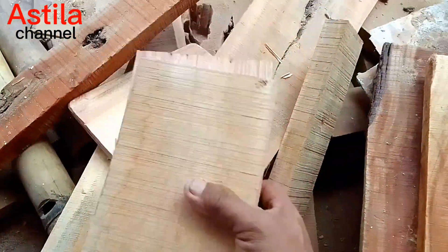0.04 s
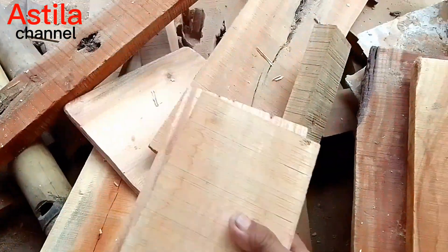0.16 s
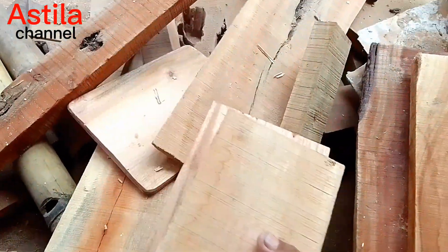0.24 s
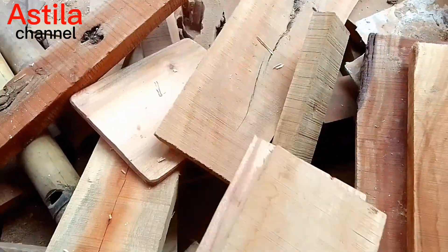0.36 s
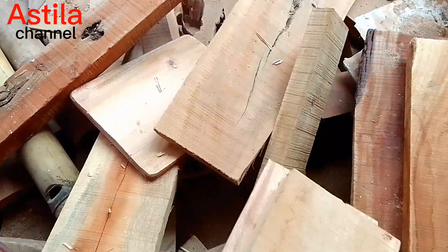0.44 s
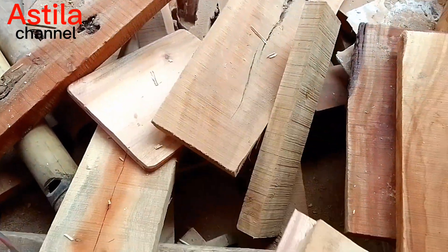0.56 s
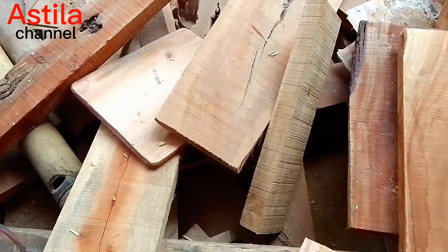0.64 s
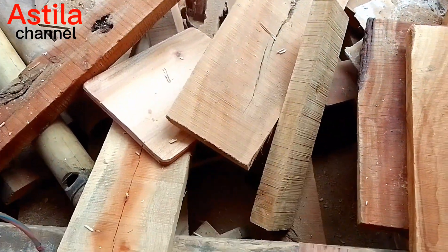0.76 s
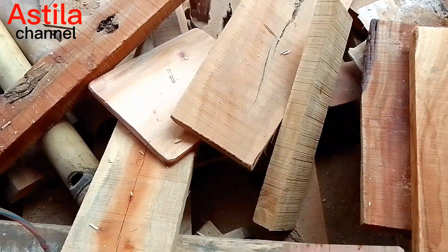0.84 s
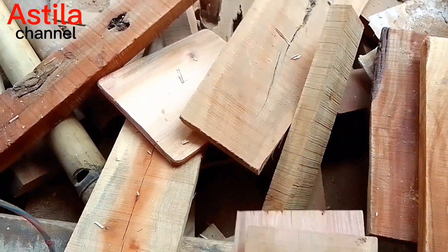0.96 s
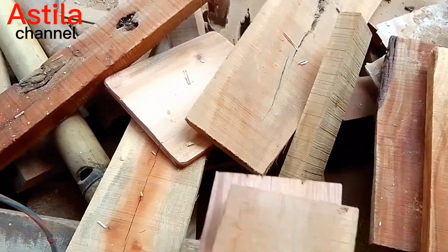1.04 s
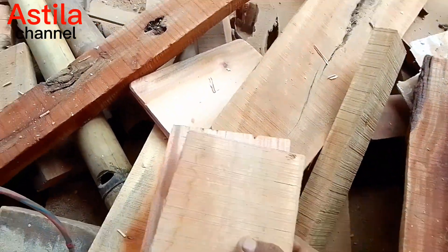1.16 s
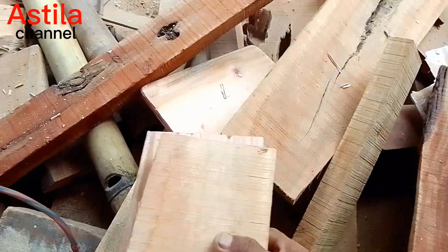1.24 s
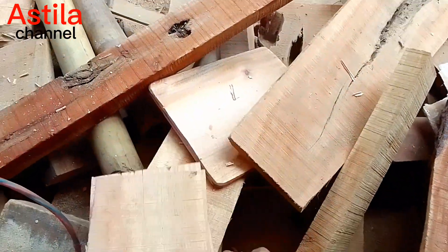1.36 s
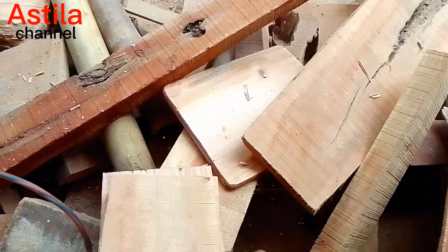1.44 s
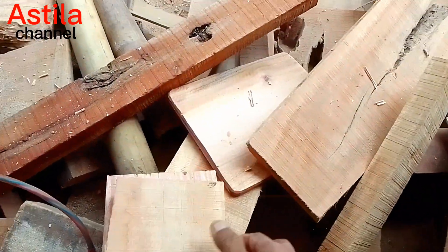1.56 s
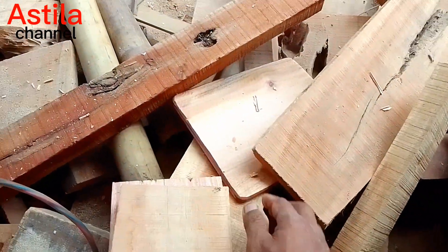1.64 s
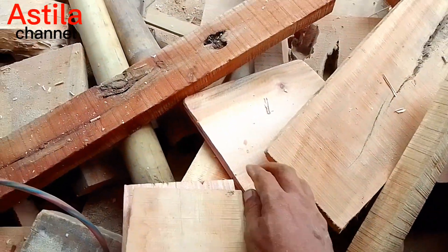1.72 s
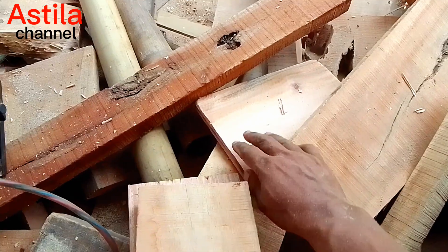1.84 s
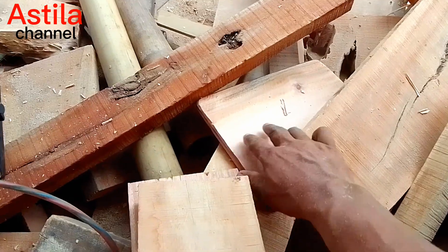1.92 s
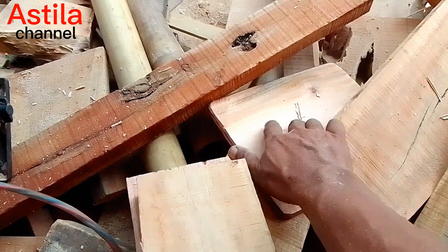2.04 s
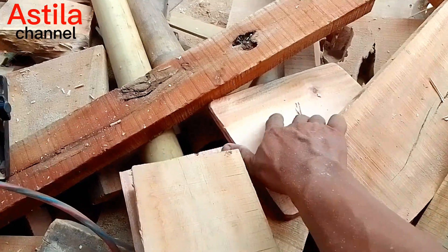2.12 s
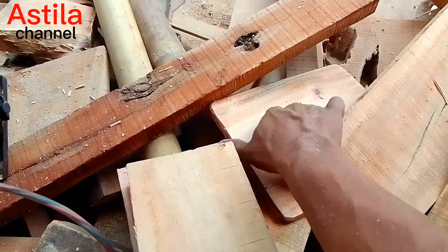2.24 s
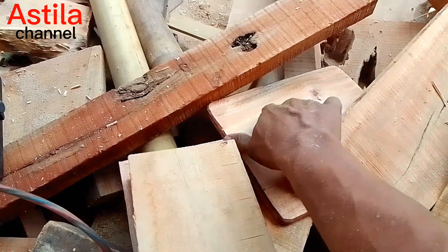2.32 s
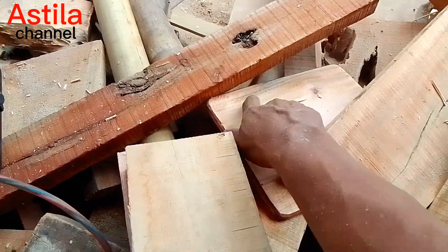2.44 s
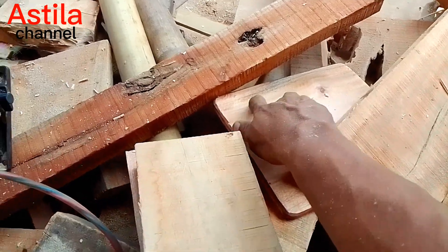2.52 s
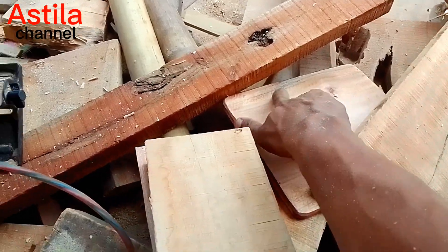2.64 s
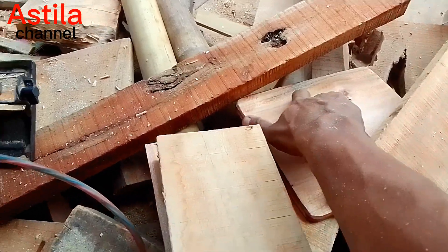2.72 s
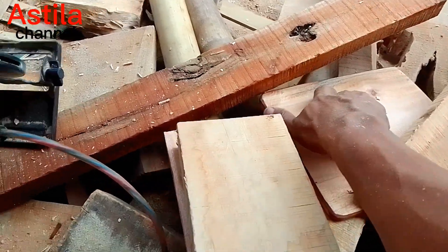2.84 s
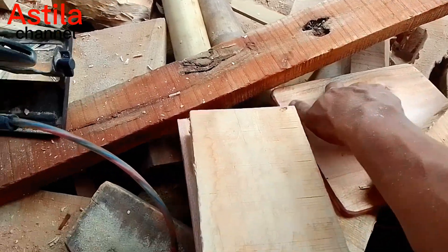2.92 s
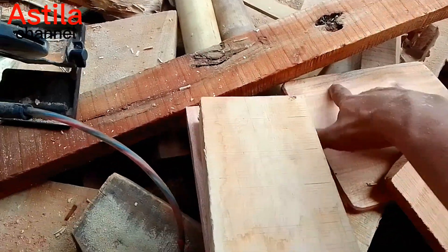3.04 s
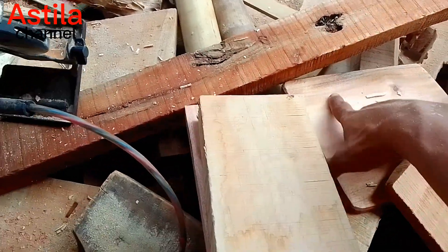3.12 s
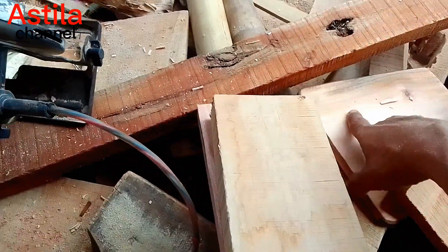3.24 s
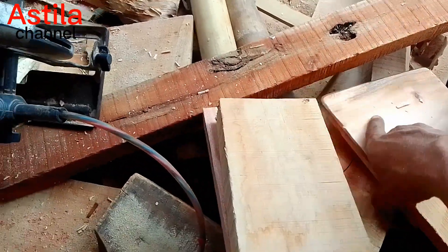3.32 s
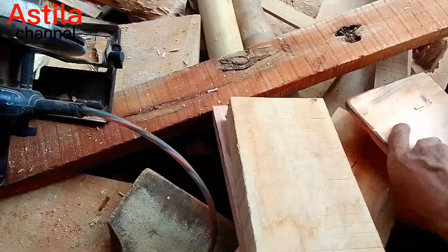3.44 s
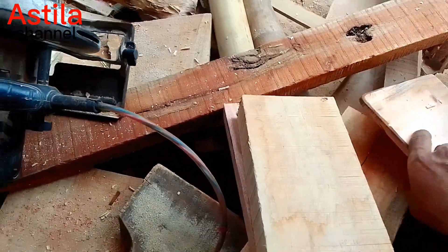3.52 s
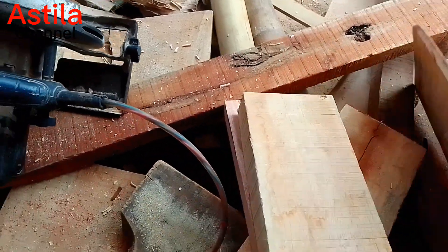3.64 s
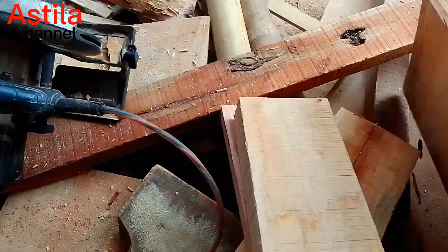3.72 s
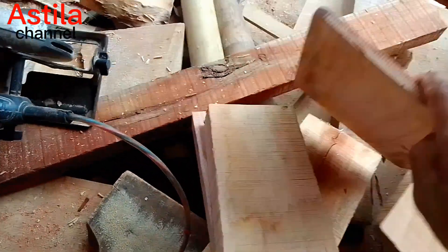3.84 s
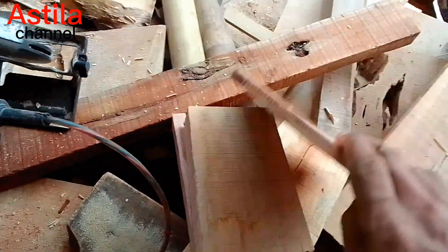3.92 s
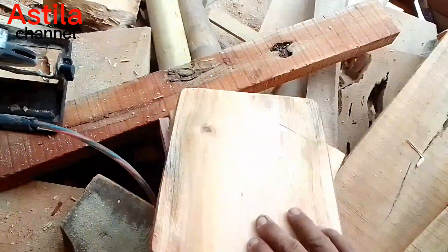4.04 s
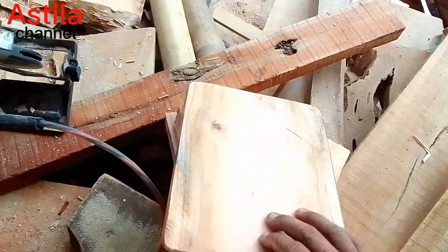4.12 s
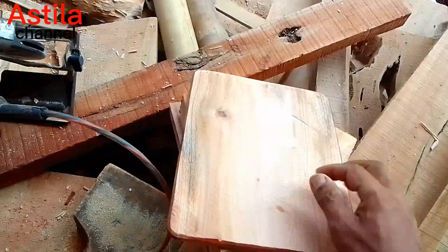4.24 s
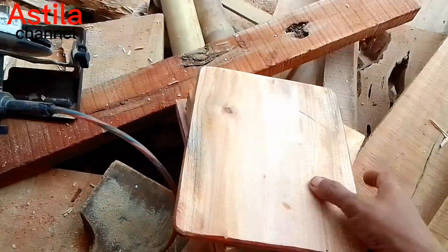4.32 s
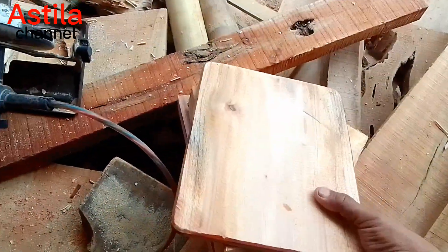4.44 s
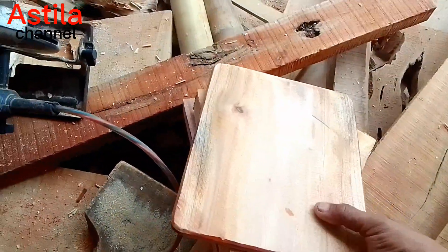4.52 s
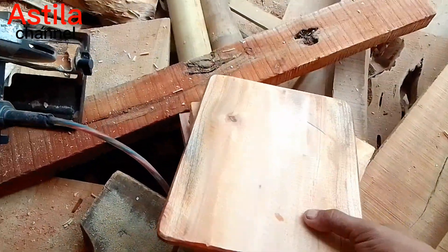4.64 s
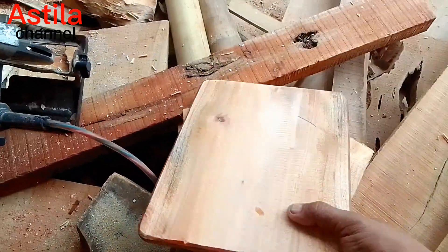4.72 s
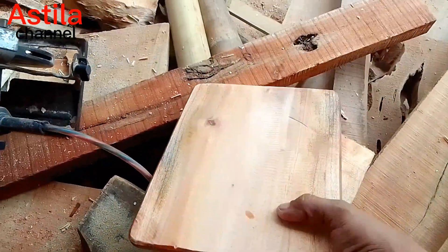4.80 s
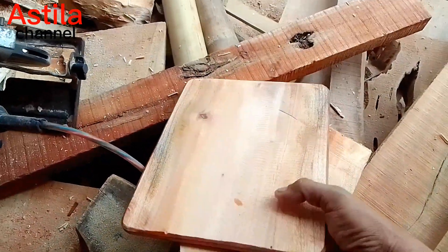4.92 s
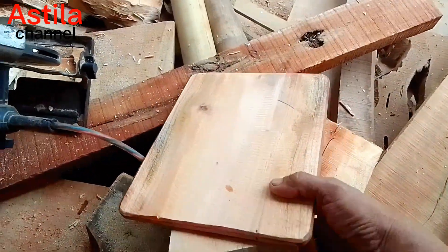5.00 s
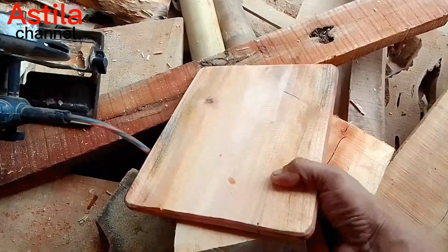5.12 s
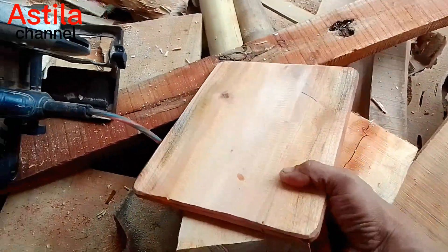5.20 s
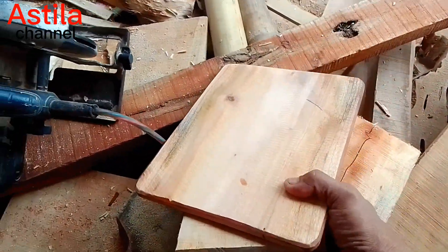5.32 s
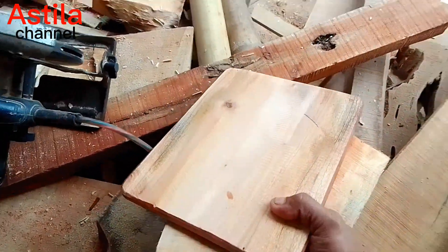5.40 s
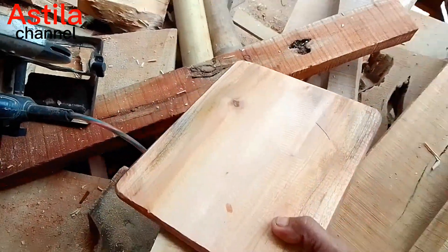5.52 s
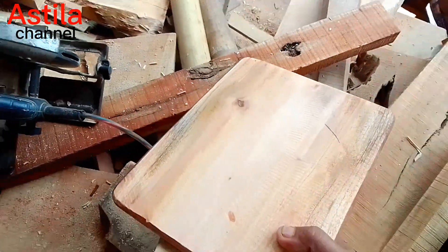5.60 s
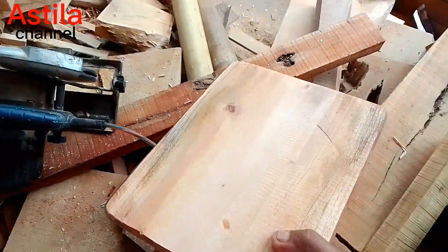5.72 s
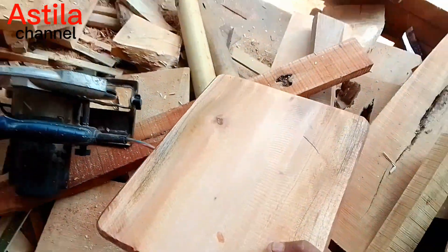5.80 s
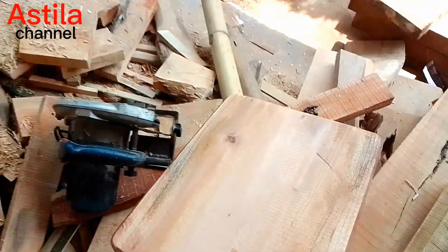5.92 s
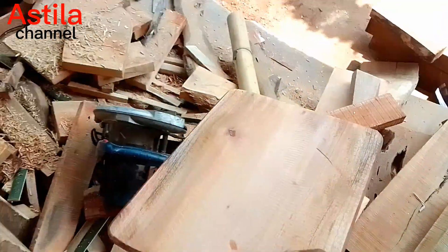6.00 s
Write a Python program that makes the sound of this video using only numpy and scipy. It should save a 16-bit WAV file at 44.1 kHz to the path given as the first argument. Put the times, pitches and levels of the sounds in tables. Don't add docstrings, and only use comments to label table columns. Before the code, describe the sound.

Dry sawn boards are handled on a pile of offcuts: one sharp drop, a second rattling drop with short shed echoes, then near-silence. Soft stick-slip rubbing builds to splintery scrapes and several loud woody knocks around the middle, then fades to gentle knocks and a short squeaky rub. Close microphone, slight low air rumble, quiet yard behind, one tiny far bird chirp.

```python
import sys
import numpy as np
from scipy import signal
from scipy.fft import rfft, irfft
from scipy.io import wavfile
from scipy.ndimage import uniform_filter1d

SR = 44100
rng = np.random.default_rng(int(sys.argv[2]) if len(sys.argv) > 2 else 0)


def gain_from_db(level_db):
    decades = np.asarray(level_db, float) / 20
    return 10 ** decades


def to_wav(s):
    ch = np.atleast_2d(s).T
    pcm = np.round(np.clip(ch, -1, 1) * 32767)
    wavfile.write(sys.argv[1], SR, pcm.astype(np.int16))


N = 267290


def evened(x):
    return x / np.sqrt(np.mean(x ** 2) + 1e-20)


def level_at(points, hz):
    f, value = np.transpose(points)
    return np.interp(np.log(hz + 1), np.log(f + 1), value)


def add(mix, s, sound):
    part = mix[round(s * SR):][:len(sound)]
    part += sound[:len(part)]


def coloured(x, points):
    gain = gain_from_db(level_at(points, np.fft.rfftfreq(len(x), 1 / SR)))
    return evened(irfft(rfft(x) * gain, len(x)))


def resonances(x, peaks):
    total = 0
    for hz, width, db in peaks:
        b, a = signal.iirpeak(hz, hz / np.clip(2.0 * width, 85, 2600), SR)
        total = total + gain_from_db(db) * signal.lfilter(b, a, signal.lfilter(b, a, x))
    return total


def drifting(count, size):
    once = uniform_filter1d(rng.standard_normal(count), size=size)
    return evened(uniform_filter1d(once, size=size))


def slips(count, per_s, spread_db):
    size = gain_from_db(spread_db * np.minimum(rng.exponential(1, count), 4))
    return size * rng.standard_normal(count) * (rng.random(count) < per_s / SR)


def knock(row, wood, ring, contact_ms, rattle, top_hz):
    s, peak_db, crack_db, thud_db, note_hz = row
    t = np.arange(6000) / SR
    hz, width, db = np.transpose(list(wood) + [(note_hz, 90, 6)])
    luck = rng.standard_normal((len(hz), 3))
    t60 = np.clip(ring, .2, 4) * np.clip(2.2 / width, .012, .04)
    t60 = t60 * np.minimum(1, 1600 / hz)
    mode_db = db + 2 * luck[:, 0] + 10 * np.log10(width)
    fade = gain_from_db(mode_db[:, None] - 60 * t / t60[:, None])
    detuned = hz * (1 + .01 * luck[:, 1])
    phase = 2 * np.pi * detuned[:, None] * t + 1.2 * luck[:, 2:]
    modes = (fade * np.sin(phase)).sum(0)

    noise = rng.standard_normal((2, len(t)))
    dense = coloured(noise[0], [(200, -17.0), (700, 5.0), (1500, 11.5), (2500, -3.0), (3700, -21.0),
                                (5000, -34.0), (9000, -55.5), (11000, -85.0)])
    dense *= gain_from_db(-60 * t / (0.043 * np.minimum(ring, 1)))
    u = t / (np.clip(contact_ms, .1, 12) / 1000)
    swell = (1 - np.exp(-u)) ** 2
    body = swell * (modes / abs(modes).max() + rattle * dense)
    body = signal.sosfilt(signal.butter(2, min(top_hz, 15000), fs=SR, output="sos"), body)

    crack = coloured(noise[1], [(2000, -28), (3500, 15.0), (6000, -5.0), (9000, -16.5),
                                (10500, -37), (15500, -29.5)])
    crack *= np.e * u * np.exp(-u) + 0.063 * gain_from_db(-60 * t / 0.044) * swell
    thud = coloured(noise[1], [(90, -17.0), (200, 11.5), (450, 6.0), (900, -42.5), (4000, -89.5)])
    thud *= gain_from_db(-60 * t / 0.077) * (1 - np.exp(-t / 0.00097))
    sound = 1.025 * body / abs(body).max() + gain_from_db(crack_db) * crack + gain_from_db(thud_db) * thud
    return s, gain_from_db(peak_db) * signal.sosfilt(signal.butter(3, 170, "high", fs=SR, output="sos"), sound)


def blows():
    # start in seconds, peak in dB, crack and thud in dB re peak, main note in Hz.
    first_drop = [
        (0.779, -17, -54, -18, 1320),
        (0.789, -11.5, -55.5, -38, 2058),
        (0.794, -6, -55.5, -41, 1290),
    ]
    second_drop = [
        (1.487, -14.5, -27.5, -30.5, 1210),
        (1.493, -4, -35, -34, 1260),
        (1.51, -10.5, -26, -28, 1100),
        (1.518, -0.5, -19.5, -25.5, 1740),
        (1.522, -1, -17, -23, 2127),
        (1.535, -5, -18, -23, 1180),
        (1.553, -12, -15.5, -36.5, 1140),
        (1.562, -7.5, -31.5, -17.5, 1440),
        (1.574, -14, -15.5, -26, 2040),
        (1.89, -50.5, -35, -6.5, 1110),
    ]
    pull = [(2.348, -39.5, -47.5, -24, 344), (2.408, -56.5, -27, -15, 1240), (2.975, -34, -46, -27, 1377),
            (2.987, -27.5, -43, -38, 528), (3.046, -35.5, -39.5, -13, 537), (3.392, -32, -28, -30, 548),
            (3.461, -17.5, -37, -20, 1930), (3.466, -11.5, -34, -23.5, 537),
            (3.478, -16.5, -33.5, -16.5, 682), (3.533, -14.5, -24.5, -8.5, 1253),
            (3.564, -17, -35.5, -6.5, 458)]
    stack = [(3.867, -16, -30, -8, 557), (3.8811, -1.5, -23.5, -18, 996), (3.916, -26, -9, -13.5, 960),
             (3.979, -14, -37.5, -5.5, 931), (4.048, 2.5, -38.5, -25, 660), (4.053, -2, -32, -14, 1030),
             (4.067, -11.5, -41.5, -7.5, 960), (4.123, -8.5, -25, -22, 1950), (4.178, -18, -28, -11, 1670),
             (4.183, -3.5, -22.5, -73, 1058), (4.195, -10.5, -38.5, -17.5, 827),
             (4.429, -47.5, -41, 2.5, 810)]
    lift = [
        (4.796, -34, -37.5, -15, 854),
        (4.842, -17, -63, -18.5, 924),
        (5.102, -24.5, -61, -8, 1580),
        (5.222, -38, -38, -3, 900),
        (5.379, -60, -2, -1, 1590),
        (5.441, -33, -35, 0, 957),
    ]
    # frequency in Hz, width in Hz, level in dB.
    wood_first = [(328, 360, -9.5), (927, 6.4, -1), (1246.6, 72, 6.5), (1410, 50, -5), (1740, 180, 1.5),
                  (2043, 83, -7.5), (2884, 61, -19.5), (2260, 6.7, -10), (3270, 28, -28.5)]
    wood_second = [(660, 27, -13), (1200, 40, 0), (1400, 13, -5), (1729, 40, 1.5), (2023, 85, 3),
                   (2363, 130, -9), (2900, 37.4, -2.5), (3500, 46, -6), (3833, 170, -16),
                   (4360, 190, -17.5)]
    wood_pull = [(219.2, 23, -2.5), (528, 27, -5.5), (690, 28, 4.5), (1030, 89, -5.5), (1200, 240, 0),
                 (1670, 200, -10.5), (2090, 16, -9), (2740, 75, -20), (3600, 29, -42)]
    wood_stack = [(543, 86, 1.5), (1030, 12, -10.5), (1421, 8.1, 4), (1706.6, 71, -4), (1980, 20, -19),
                  (2740, 90, -11), (3050, 15, -17.5), (3285, 46, -27.5), (3670, 175.4, -26.5),
                  (4090, 340, -11)]
    wood_lift = [(353, 29, -0.5), (548, 58, 3), (882, 48, 11), (1274, 120, 9), (1580, 12, 16),
                 (2130, 66, -34), (2690, 250, -16), (3350, 200, -50.5), (4250, 26, -36)]
    ring = (1.5, 1.1, 2.1, 0.87, 1.1)
    contact_ms = (0.14, 1, 0.54, 0.89, 0.83)
    rattle = (0.22, 0.31, 0.13, 0.29, 0.28)
    top_hz = (3800, 9000, 6000, 7000, 5000)
    echo_db = (-10, -8, -17, -16.5, -11)
    roof_db = (13, -12, -1.5, 3, -5)

    out = np.zeros(N)
    handlings = first_drop, second_drop, pull, stack, lift
    woods = wood_first, wood_second, wood_pull, wood_stack, wood_lift
    for i, (rows, wood) in enumerate(zip(handlings, woods)):
        struck = np.zeros(N)
        for row in rows:
            add(struck, *knock(row, wood, ring[i], contact_ms[i], rattle[i], top_hz[i]))
        out += in_shed(struck, echo_db[i], roof_db[i])
    gone = knock((0, -33, -25, -30, 2070), wood_first, 0.71, 0.86, rattle[0], top_hz[0])[1]
    add(out, 0, signal.fftconvolve(gone, shed_tail(roof_db[0]))[SR // 8:])
    return out


def slide(row, wood, grit_db, squeak, airy_db):
    # frequency in Hz, level in dB per Hz.
    grit_colour = [(1470, -27.5), (2500, -1.5), (5410, -8), (5660, -11), (7280, -9.5), (8880, -13),
                   (10700, -51.5), (15500, -39)]
    # frequency in Hz, width in Hz, level in dB.
    grit_peaks = [(5920, 97, 8.5), (6220, 66, -22.5), (7240, 120, 9.5), (8500, 170, 0)]
    s, length, from_db, to_db, face_hz = row
    t = np.arange(0, length + 0.25, 1 / SR)
    ramp_db = (to_db - from_db) * (np.minimum(t / length, 1) - .5)
    release_db = 519 * np.maximum(t - length, 0)
    press_db = (from_db + to_db) / 2 - release_db
    grip = uniform_filter1d(uniform_filter1d(rng.standard_normal(len(t)), size=350), size=200)
    stutter = gain_from_db(1.7 * evened(grip))

    rubbed = slips(len(t), 3500, 2.3) * stutter
    modes = [(hz * (1 + .018 * rng.standard_normal()), width, db) for hz, width, db in wood]
    modes.append((face_hz, 45, 2.5))
    ringing = 0
    for mode in modes:
        shift = gain_from_db(1.5 * drifting(len(t), size=900))
        ringing = ringing + resonances(rubbed * shift, [mode])
    dull = coloured(rubbed, [(70, -35.0), (150, 6.0), (400, 5.5), (1800, -5.5), (4000, -34.5),
                             (8000, -52.5), (11000, -76.5)])
    board = evened(ringing) + 0.59 * dull

    dust = slips(len(t), 12000, 1.36) * np.sqrt(stutter) * gain_from_db(2.7 * drifting(len(t), size=350))
    finest = gain_from_db(airy_db) * coloured(dust, [(8500, -28.5), (10000, 0.5), (15500, 4.0)])
    grit = coloured(dust, grit_colour) + squeak * evened(resonances(dust, grit_peaks)) + finest
    grit_gain = gain_from_db(grit_db + 0.45 * ramp_db)
    rise_s = 0.045 if to_db > from_db else .011
    onset = np.minimum(t / rise_s, 1)
    return s, gain_from_db(press_db) * (gain_from_db(ramp_db) * board + grit_gain * grit) * onset


def strokes():
    # start in seconds, length in seconds, pressure in dB at start and at end, face note in Hz.
    ease = [
        (2.383, 0.25, -72, -80.5, 340),
        (2.661, 0.13, -76.5, -51.5, 1354),
        (2.78, 0.22, -67, -72, 630),
    ]
    drag = [
        (3.0, .085, -48, -48, 558),
        (3.085, 0.32, -49.5, -70, 519),
    ]
    shove = [
        (3.32, 0.15, -62, -30, 560),
        (3.49, 0.07, -41.5, -33.5, 509),
    ]
    shuffle = [
        (3.61, 0.096, -40.5, -36.5, 560),
        (3.738, 0.044, -29, -34.5, 1575),
        (3.79, 0.082, -24.5, -29.5, 979),
        (3.9, 0.0847, -33, -42.5, 1005),
    ]
    seat = [
        (3.99, 0.065, -29, -36.5, 477),
        (4.08, 0.05, -27.5, -29.5, 964),
    ]
    grasp = [
        (4.8, 0.067, -29.5, -54.5, 870),
        (4.859, 0.12, -47, -56, 1334),
    ]
    carry = [
        (4.96, 0.14, -46.5, -45.5, 1950),
        (5.119, 0.3, -47, -65, 1600),
    ]
    settle = [
        (5.45, 0.21, -49.5, -77, 698),
        (5.82, 0.21, -78, -77, 660),
    ]
    # frequency in Hz, width in Hz, level in dB.
    face_ease = [(320.4, 65, 8), (660, 410, 6), (1590, 25, -6), (2200, 41, -1), (2810, 40, -3.5)]
    face_drag = [(390, 140, -7), (1110, 40, -11), (1397, 64, -9.5), (2840, 110, -24), (3460, 41, -29)]
    face_shove = [(307, 64, -13.5), (1320, 200, -5.5), (1580, 26, -10.5), (1980, 220, -16),
                  (3412, 110, -25.5)]
    face_shuffle = [(450, 207, -9), (1242, 110, -6.5), (1550, 68, -3.5), (1950, 32, -10.5),
                    (2400, 87, -10.5), (2626, 120, -13.5), (3036, 72.6, -16.5), (3347, 120.2, -15)]
    face_seat = [(213, 40, -6), (343, 164, -3), (830, 120, -3.5), (1140, 33, 2), (1163, 27, -10),
                 (1960, 108.4, -32.5)]
    face_grasp = [(310, 36, 0.5), (940, 24, -1), (1274, 33, -4.5), (1600, 40, -11), (2730, 62, -19.5)]
    face_carry = [(900, 100, -5.5), (1186, 160, -2), (1522, 78, 3.5), (1940, 66, -6), (2890, 50, -23),
                  (3260, 60, -33)]
    face_settle = [(300, 120, -2), (950, 40, -4), (1537, 70, -21)]
    grit_db = (-11.5, -25, -16, -15.5, -37, -29, -26, -39)
    squeak = (0.47, 0.58, 0.18, 0.079, 0.11, 0.14, 0.088, 0.091)
    airy_db = (-17, -14, -38.5, -28.5, -25, -23, -6.5, -27.5)

    out = np.zeros(N)
    movements = ease, drag, shove, shuffle, seat, grasp, carry, settle
    faces = face_ease, face_drag, face_shove, face_shuffle, face_seat, face_grasp, face_carry, face_settle
    for rows, *surface in zip(movements, faces, grit_db, squeak, airy_db):
        for row in rows:
            add(out, *slide(row, *surface))
    return out


def catch(s, dies_s, db, hz, width):
    t = np.arange(12000) / SR
    snag = slips(len(t), 6000, 2.5)
    fade = gain_from_db(db - 20 * t / np.maximum(dies_s, .004))
    onset = np.minimum(t / (0.0012 + 0.15 * abs(dies_s)), 1)
    return s, fade * onset * evened(resonances(snag, [(hz, width / 2, 0)]))


def snags():
    # start in seconds, decay in seconds, rms in dB, frequency in Hz, width in Hz.
    ease = [
        (2.726, .02, -60, 1900, 900),
        (2.742, 0.012, -53, 1980, 900),
        (2.768, 0.068, -72, 6000, 700),
        (2.785, 0.026, -66.5, 3020, 500),
        (3.026, 0.054, -47, 1600, 199.4),
        (3.028, 0.035, -58, 3000, 500),
        (3.13, 0.17, -66, 8500, 199),
        (3.15, 0.072, -59, 3020, 120),
        (3.303, 0.029, -59, 900, 700),
        (3.342, 0.019, -63, 8200, 2588),
    ]
    shove = [(3.391, 0.12, -46.5, 2730, 149), (3.394, 0.1, -37.5, 1980, 150), (3.411, .05, -58, 4890, 302),
             (3.435, 0.017, -46, 3600, 905), (3.434, 0.024, -52, 5500, 1500),
             (3.454, 0.022, -32.5, 2680, 500), (3.461, 0.065, -45.5, 3600, 302),
             (3.528, 0.019, -39, 4150, 695), (3.527, 0.014, -45.5, 8500, 900),
             (3.545, 0.009, -56.5, 7300, 890), (3.564, 0.017, -44.5, 7220, 500),
             (3.574, 0.013, -47, 7200, 500), (3.577, 0.016, -44, 2400, 302)]
    shuffle = [(3.64, 0.037, -42, 3560, 505), (3.658, 0.01195, -43, 7500, 2480),
               (3.658, 0.047, -40.5, 3550, 900), (3.679, 0.062, -31, 1380, 308),
               (3.701, .01, -48, 7400, 2490), (3.75, .03, -34, 2730, 400), (3.752, 0.027, -44.5, 4600, 500),
               (3.79, 0.013, -33, 3870, 1998), (3.791, .01, -43, 7900, 2005), (3.792, 0.07, -29, 700, 500),
               (3.824, 0.022, -40, 4800, 1600), (3.838, 0.034, -28, 2520, 250),
               (3.869, 0.027, -32, 4000, 1800), (3.87, 0.023, -44, 7900, 1790),
               (3.916, 0.0241, -29, 2740, 503), (3.916, .01, -40, 7750, 2400),
               (3.931, .05, -46, 7900, 2194), (3.94, .05, -48.5, 5860, 702)]
    seat = [
        (4.075, 0.012, -48.5, 3000, 900),
        (4.123, 0.018, -24.5, 3050, 200),
        (4.122, 0.0097, -36, 4870, 500),
        (4.135, 0.038, -29.5, 1260, 500),
        (4.148, 0.017, -40, 1890, 700),
        (4.184, 0.04, -21, 800, 700),
    ]
    carry = [(4.796, 0.0084, -47, 2600, 895), (4.807, 0.017, -46, 1900, 702),
             (4.81, 0.16, -67.5, 5500, 300), (4.83, 0.25, -72, 4250, 200), (4.86, 0.21, -65, 3320, 250),
             (4.9, 0.21, -71, 6520, 200), (4.9, 0.092, -70, 7320, 120), (5.008, 0.039, -42.5, 1945, 152),
             (5.039, 0.034, -41, 1930, 150), (5.15, 0.032, -70, 3280, 304), (5.156, 0.12, -73, 2870, 100),
             (5.156, 0.034, -48, 1540, 147), (4.512, 0.03, -54, 300, 250)]
    scattered = [(1.518, .03, -50, 12500, 2500), (3.13, 0.044, -63, 12500, 2500),
                 (3.53, .015, -64.5, 21000, 2500), (3.8, .04, -71, 20000, 2500),
                 (3.93, 0.081, -62, 11750, 2500), (4.05, 0.017, -53.5, 12500, 2350),
                 (4.122, 0.0155, -28.5, 1320, 340), (3.64, 0.16, -48.5, 5200, 1800),
                 (3.47, .06, -47.5, 4700, 900), (4.184, 0.03, -33.5, 2500, 890),
                 (4.057, 0.029, -14, 860, 690), (.8, 0.16, -44.5, 460, 300), (1.555, .06, -26, 680, 100),
                 (2.77, 0.05, -54, 880, 230), (5.06, .09, -43, 1700, 300), (5.443, 0.042, -53, 950, 780),
                 (4.07, .1, -26, 380, 250), (3.98, .04, -27.5, 604, 700), (3.155, 0.04, -63, 3400, 100),
                 (2.5, 0.205, -61, 1200, 86), (1.1, 0.13, -67.5, 370, 90), (.8, 0.17, -56, 3300, 990)]
    out = np.zeros(N)
    for row in ease + shove + shuffle + seat + carry + scattered:
        add(out, *catch(*row))
    return out


def sing(s, length, hz, db):
    t = np.arange(12000) / SR
    swell = drifting(len(t), size=round(SR / 45 / 2))
    waver = drifting(len(t), size=400)
    tone = gain_from_db(2.4 * swell) * np.sin(2 * np.pi * hz * t + 1.1 * waver)
    fade_db = -7 * t / length - 519 * np.maximum(t - length, 0)
    shape = np.minimum(t / 0.0043, 1) * gain_from_db(fade_db)
    return s, gain_from_db(db) * np.sqrt(2) * tone * shape


def singing_faces():
    # start in seconds, length in seconds, frequency in Hz.
    notes_sung = [(2.765, .19, 1370), (2.8, .17, 2850), (2.765, .15, 620), (3.025, .1, 1450),
                  (3.742, .045, 980), (3.745, .035, 1560), (3.795, .048, 980), (3.095, .2, 750),
                  (5.445, .11, 700), (5.47, .16, 904), (5.5, .12, 590), (5.44, .03, 1660),
                  (5.47, .08, 1500)]
    sung_db = (-66, -74.5, -59.5, -57, -31.5, -30.5, -27, -50, -55.5, -64.5, -65, -52, -68)
    out = np.zeros(N)
    for row, db in zip(notes_sung, sung_db):
        add(out, *sing(*row, db))
    return out


def brush(s, length, db, pitch):
    # frequency in Hz, width in Hz, level in dB.
    skin_peaks = [(4316, 85, -3.5), (4560, 120, 5), (5260, 510, 1.5), (6950, 49, 6), (7620, 37, -9),
                  (8840, 190, -7.5)]
    t = np.arange(0, length, 1 / SR)
    skin = slips(len(t), 9000, 2.0)
    bands = evened(resonances(skin, [(hz * pitch, width, level) for hz, width, level in skin_peaks]))
    broad = coloured(skin, [(2500 * pitch, -30), (4200 * pitch, 0), (8500 * pitch, -4), (10500 * pitch, -35)])
    stroke = np.sin(np.pi * (t / length) ** 0.41)
    return s, gain_from_db(db) * stroke * (.6 * bands / max(pitch, 1) ** 3 + broad)


def fingertips():
    # start in seconds, length in seconds, level in dB, pitch factor.
    touches = [
        (0.187, 0.108, -68, 0.98),
        (0.28, 0.066, -69, 1),
        (1.198, 0.07, -78.5, 0.83),
        (2.495, 0.09, -78.5, 0.54),
        (3.116, 0.1, -71, 1.18),
        (4.711, 0.12, -81.5, 0.77),
        (4.9, 0.088, -70, 1.1),
        (5.095, 0.35, -79.5, 1.9),
        (5.915, 0.087, -80, 0.61),
    ]
    out = np.zeros(N)
    for row in touches:
        add(out, *brush(*row))
    return out


def shed_tail(roof_db=0.0):
    # frequency in Hz, t60 in seconds.
    decay = [(150, 0.54), (400, 0.32), (1040, 0.32), (1800, 0.39), (2760, 0.42), (7280, 0.39),
             (14000, 0.18)]
    taps = np.zeros(SR)
    at = np.arange(300, SR - 20, 20)
    taps[at + rng.integers(0, 20, len(at))] = rng.choice([-1., 1.], len(at))
    taps *= 1 + 1.2 * np.exp(-((np.arange(SR) / SR - .065) / .014) ** 2)
    hz, t, z = signal.stft(taps, SR, nperseg=256)
    fade_db = -60 * t / np.maximum(level_at(decay, hz), .05)[:, None]
    late = gain_from_db(-17 + fade_db / 1.9)
    tail = signal.istft(z * (gain_from_db(fade_db) + late), SR, nperseg=256)[1]
    tail = tail + resonances(tail, [(1290, 45, roof_db)])
    return tail / np.linalg.norm(tail)


def in_shed(sound, echo_db, roof_db=0.0):
    return sound + gain_from_db(echo_db) * signal.fftconvolve(sound, shed_tail(roof_db))[:N]


def chirp():
    # start in seconds, level in dB, first and last frequency in Hz, length in seconds.
    call = (1.197, -75, 6000, 3800, .016)
    s, db, from_hz, to_hz, length = call
    t = np.arange(0, length, 1 / SR)
    note = signal.chirp(t, from_hz, length, to_hz) * np.hanning(len(t))
    return s, gain_from_db(db) * note * (1 + rng.standard_normal(len(t)))


def patchy(colour, size, patch_db):
    frames, hz = N * 4 // size + 6, np.fft.rfftfreq(size, 1 / SR)
    a, b, patches = rng.standard_normal((frames, len(hz), 3)).T
    patches = evened(uniform_filter1d(uniform_filter1d(patches, 8, 0), 10, 1))
    db = level_at(colour, hz)[:, None] + patch_db * patches
    noise = signal.istft((a + 1j * b) * gain_from_db(db), nperseg=size, noverlap=size * 3 // 4)[1]
    return evened(noise[:N])


def air():
    # time in seconds, level in dB.
    gusts = [(0.0, -62), (0.661, -69), (0.79, -52.5), (1.401, -67.5), (1.53, -45.5), (1.62, -55.5),
             (2.182, -65), (3.4, -52), (4.07, -53.5), (4.25, -56.5), (4.54, -39), (4.759, -62.5),
             (5.42, -41), (5.65, -57), (5.72, -48), (6.06, -60.5)]
    # frequency in Hz, level in dB per Hz.
    rumble_colour = [(8.8, -37), (15, -13), (38, 9.5), (87, 5.5), (152, -2), (216, -13), (700, -34),
                     (1000, -80.5)]
    # time in seconds, peak in dB, frequency in Hz.
    bumps = [
        (1.526, -31, 35),
        (4.454, -41, 90),
        (4.51, -36.5, 86.7),
        (4.565, -42, 92),
        (5.239, -40, 79.2),
        (5.36, -34.5, 51.4),
        (5.428, -36, 60.3),
        (5.744, -31.5, 72.6),
    ]
    s, db = np.transpose(gusts)
    out = gain_from_db(np.interp(np.arange(N) / SR, s, db)) * patchy(rumble_colour, size=2048, patch_db=1.3)
    t = np.arange(-.03, .05, 1 / SR)
    bump_shape = np.exp(-(t / np.where(t < 0, .008, .017)) ** 2)
    for at, peak_db, hz in bumps:
        add(out, at - .03, -gain_from_db(peak_db) * np.cos(2 * np.pi * hz * t) * bump_shape)
    return out + gain_from_db(-70.5) * patchy(rumble_colour, size=4096, patch_db=3.5)


def yard():
    # time in seconds, level in dB.
    wash_level = [(0, -73.5), (.4, -80), (.6, -77.5), (2.699, -73), (4.55, -80), (5.6, -74), (6.06, -72.5)]
    # frequency in Hz, level in dB per Hz.
    wash_colour = [(88, -32), (150, -18.5), (533, -18.5), (777, -19), (1540, -14.5), (1830, -21),
                   (9000, -41.5), (11700, -65.5)]
    # frequency in Hz, level in dB per Hz.
    hiss_colour = [(3000, -18), (5000, 3.5), (9000, -1.5), (10500, -1.5), (15500, -10)]
    s, db = np.transpose(wash_level)
    wash = gain_from_db(np.interp(np.arange(N) / SR, s, db)) * patchy(wash_colour, size=1024, patch_db=4.0)
    return wash + gain_from_db(-94) * patchy(hiss_colour, size=1024, patch_db=4.0)


def scene():
    rubbing = strokes() + fingertips()
    add(rubbing, *chirp())
    catching = snags() + singing_faces()
    mix = blows() + in_shed(rubbing, -11.0) + in_shed(catching, -15.5)
    return (mix + air() + yard())[None]


def band_limit(x):
    return signal.sosfilt(signal.butter(12, 15830, fs=SR, output="sos"), x)


def record(dry):
    limited = dry / (1 + abs(dry / .72) ** 6) ** (1 / 6)
    limited = signal.oaconvolve(limited, signal.firwin(255, 15830, fs=SR)[None], "same")
    return band_limit(limited + .0057)


dry = scene()
out = record(dry)
to_wav(out)
```